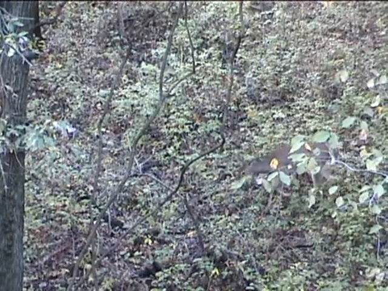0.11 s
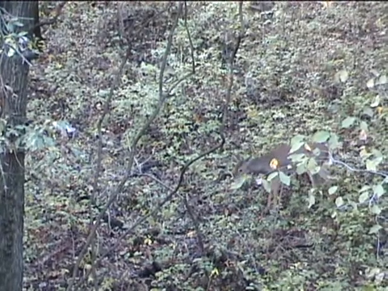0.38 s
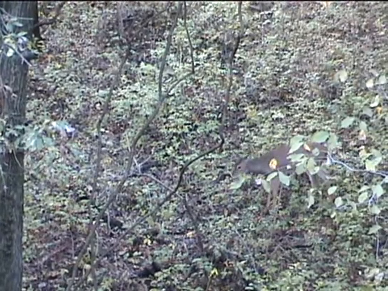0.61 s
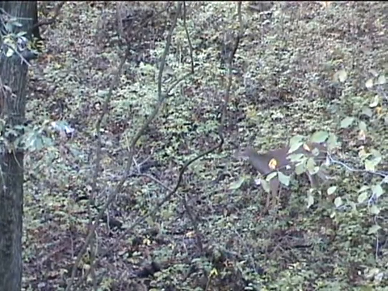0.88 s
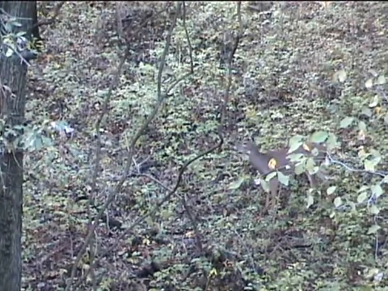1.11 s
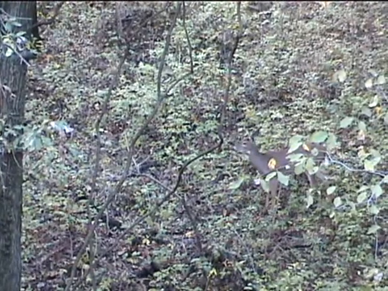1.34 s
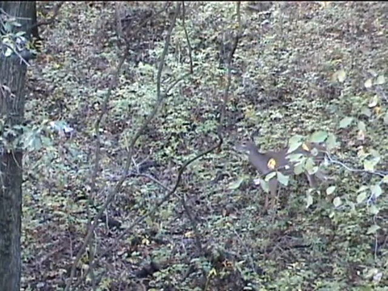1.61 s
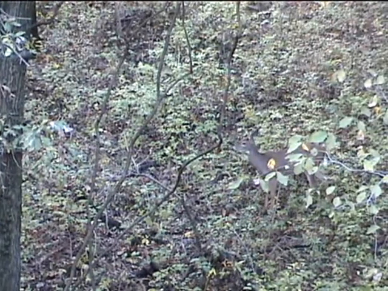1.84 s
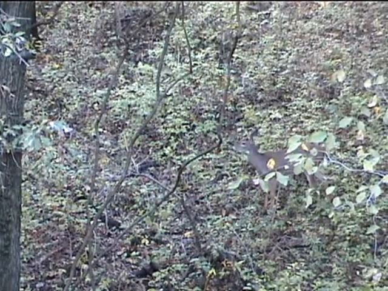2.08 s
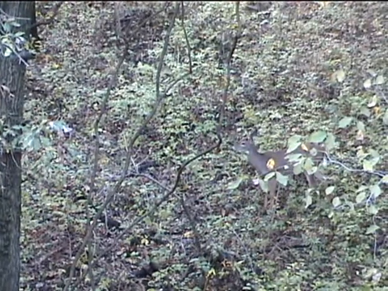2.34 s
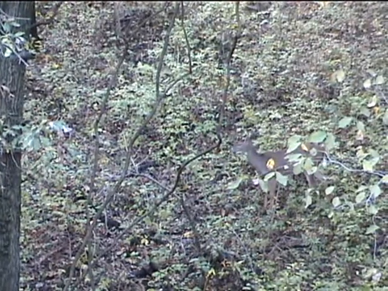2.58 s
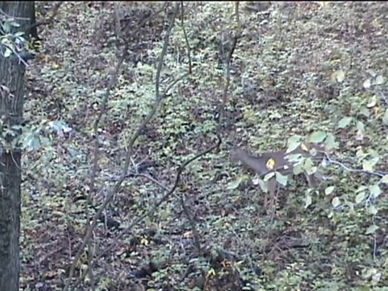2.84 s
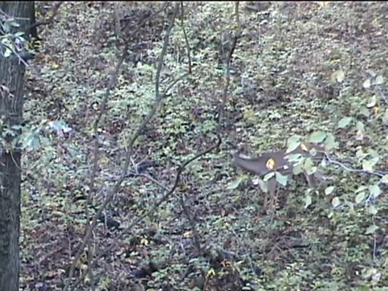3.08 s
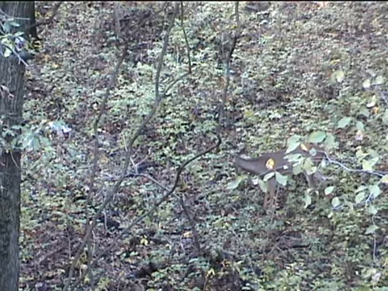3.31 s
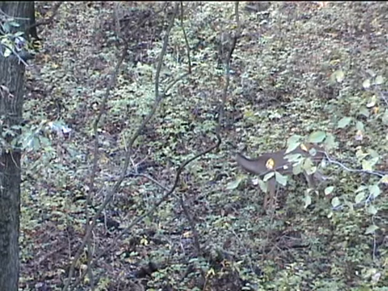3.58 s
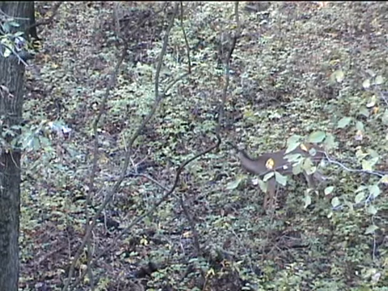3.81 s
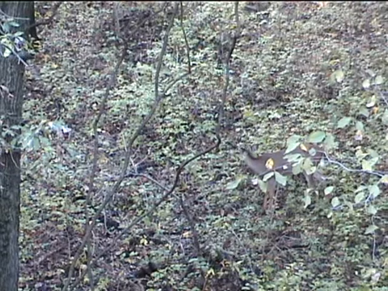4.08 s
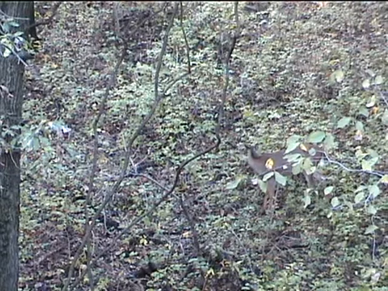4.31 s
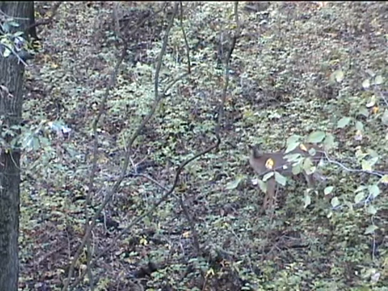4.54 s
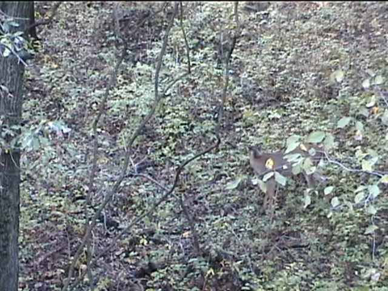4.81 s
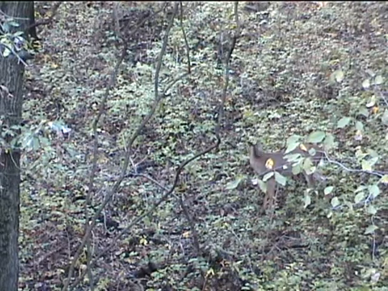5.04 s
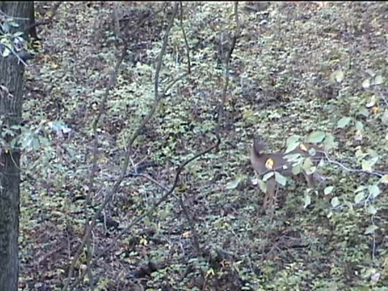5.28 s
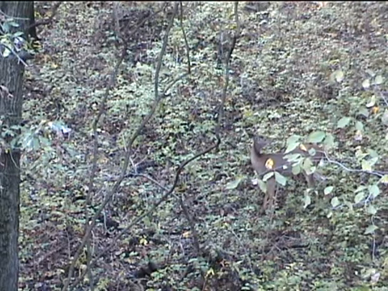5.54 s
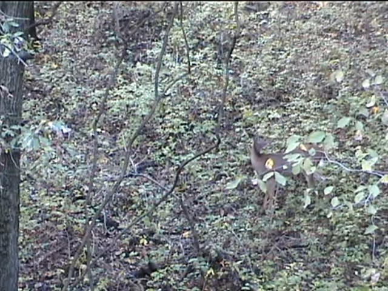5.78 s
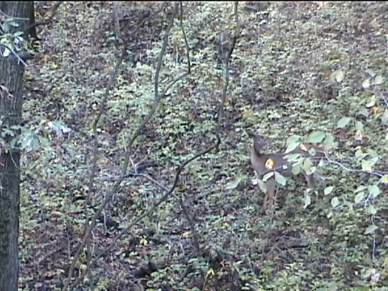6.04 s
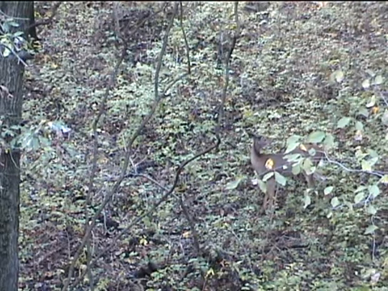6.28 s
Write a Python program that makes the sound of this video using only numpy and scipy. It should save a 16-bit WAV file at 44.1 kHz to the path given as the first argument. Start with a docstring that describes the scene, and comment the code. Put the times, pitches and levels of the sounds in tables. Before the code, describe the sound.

Woodland insects drone and sizzle steadily while one bird repeats a short rising whistle, over thin motor whine and hiss; late, a twig ticks and knocks.

```python
"""Woodland, up in a tree: a far chorus of crickets drones near 4.6 kHz, made of noise strokes ringing wings.
Higher insects sizzle above 9 kHz in the same way, and a nearer one saws a short run of rasps.
A bird repeats one rising whistle, a gliding near sine that echoes among the trunks; a second bird is fainter.
A twig ticks, then knocks dully: a few fading tones. The camera's tape mechanism whines into its own stereo
microphone as a comb of thin tones over filtered hiss; at moments the treble gathers in the centre."""
import sys
import numpy as np
from scipy import signal
from scipy.fft import rfft, irfft
from scipy.io import wavfile
from scipy.ndimage import map_coordinates

SR = 44100
rng = np.random.default_rng(int(sys.argv[2]) if len(sys.argv) > 2 else 0)


def amplitude_ratio(level_db):
    """Convert a level in decibels to the matching linear amplitude (field) ratio."""
    exponent = np.asarray(level_db, float) / 20
    return 10 ** exponent


def store_wav(level_fs):
    """Save 16-bit WAV to argv[1]."""
    pcm = np.round(np.clip(np.atleast_2d(level_fs), -1, 1) * 32767)
    wavfile.write(sys.argv[1], SR, pcm.T.astype(np.int16))


N = 282240
T = np.arange(N) / SR                # time of every sample, in seconds
HZ = np.arange(N // 2 + 1) * SR / N  # pitch of every FFT bin


def level_over_time(rows):
    """Joins (start_s, level_db) points by straight lines, at every sample."""
    start_s, level_db = np.transpose(rows)
    return np.interp(T, start_s, level_db)


def at_hz(points):
    """Joins the columns of a spectrum at every FFT bin, along a logarithmic pitch axis."""
    hz, *columns = np.transpose(points)
    return np.array([np.interp(np.log(HZ + 1), np.log(hz), column) for column in columns])


def bell(hz, width_hz):
    """Gain of a resonance applied twice: 1 on top, 6 dB down half a width to either side."""
    return 1 / (1 + ((HZ - hz) / (width_hz / 2)) ** 2)


def drift(points_per_s):
    """Slow random wandering: a smooth curve through random points of spread 1."""
    points = rng.standard_normal(int(N / SR * points_per_s) + 2)
    return map_coordinates(points, [T * points_per_s], order=3, mode="nearest")


def strokes(per_s):
    """Wing strokes of many animals at random moments, for centre and width; rms 1."""
    share = min(per_s / SR, 1)
    sounding = rng.random((2, N)) < share
    return rng.standard_normal((2, N)) * sounding / np.sqrt(share)


# how the microphone leans, mostly to the right: pitch_hz, left_minus_right_db
MICROPHONE_LEAN = [(60, -2.5), (120, 0), (240, -2), (470, 1), (940, -3.0), (1880, -2), (3750, -1.0),
                   (7470, -3), (14900, 0)]


def coloured(source, gain):
    """Filters a centre and a width signal, then adds and subtracts them into a leaning left and right."""
    mid, side = rfft(source) * gain
    lean_db = at_hz(MICROPHONE_LEAN) * np.array([[.5], [-.5]])
    return irfft(np.array([mid + side, mid - side]) * amplitude_ratio(lean_db), N)


# hiss of microphone, casing and air, before the casing's colour:
# pitch_hz, centre_db (per Hz), width_db (per Hz)
HISS_SPECTRUM = [(25, -102, -99), (100, -99, -88), (203, -95.5, -85), (360, -92, -87.5), (580, -92, -90.5),
                 (1000, -92.5, -92.5), (1220, -92.5, -93), (1680, -91, -94), (2540, -95.5, -93),
                 (3120, -93.5, -87), (3580, -101, -102), (5600, -95, -92), (7800, -99, -98.5),
                 (8850, -96.5, -93), (16000, -100, -100)]
# resonances and notches of the casing in the hiss: pitch_hz, width_hz, level_db
CASING_COLOUR = [(1184, 65, -1.5), (1753, 84, 4), (2140, 46, 4.5), (2075, 50, -7.5), (2460, 32, 4),
                 (2560, 50, -8.5), (2625, 92, 4.5), (2830, 91, -12), (2770, 60, 6.5), (7030, 130, -5)]


def hiss():
    """Steady filtered noise; in the bass the two capsules work against each other."""
    casing_db = sum(db * bell(hz, width_hz) for hz, width_hz, db in CASING_COLOUR)
    gain = amplitude_ratio(at_hz(HISS_SPECTRUM) + casing_db) * np.sqrt(SR / 2)
    return coloured(rng.standard_normal((2, N)), gain)


# tones of the head drum, before flutter: multiple of its turning rate, left_db (rms), right_db (rms)
DRUM_TONES = [(1, -73, -71), (3, -76, -71), (9, -77, -72), (11, -76, -72), (13, -71, -69), (15, -75, -69),
              (17, -77, -67), (19, -76, -67), (21, -78, -76), (23, -74, -65), (25, -71, -66),
              (27, -65, -65), (29, -73, -76), (31, -76, -68), (33, -78, -74), (35, -69, -69),
              (37, -72, -74)]
# high drum tones, mostly in the right capsule, before flutter: multiple, right_db (rms)
HIGH_DRUM_TONES = [(75, -73), (84, -73), (87, -72), (88, -74), (89, -70), (91, -73), (92, -70), (95, -73),
                   (97, -74), (99, -74), (100, -71), (112, -74), (122, -72), (130, -72), (142, -73)]
# other motor and gear tones, before flutter: pitch_hz, left_db (rms), right_db (rms)
GEAR_TONES = [(658.2, -76, -92), (799.8, -79, -68), (949.8, -72, -77), (1087.6, -76, -82),
              (1752.0, -75, -75), (1782.0, -71, -73), (1808.2, -74, -72), (2005.3, -76, -70),
              (2040.9, -64, -59.5), (2232.9, -75, -67), (2332.4, -87, -74), (2424.0, -76, -76),
              (2450.5, -79, -63), (2456.4, -78, -65), (2482.0, -73, -81), (2679.2, -77, -75),
              (2895.8, -76, -72)]
# how far the drum's tones lead in the right capsule: pitch_hz, lead_rad
DRUM_RIGHT_LEAD = [(75, -3.5), (225, -2.7), (675, -1.8), (975, 0), (2020, -.2), (2200, 1.2), (2800, 1.1),
                   (5600, 3.2), (6800, 3.7), (7500, 3.1)]
# how far the gear tones lead in the right capsule; it flips near 2.4 kHz: pitch_hz, lead_rad
GEAR_RIGHT_LEAD = [(950, -1.4), (1750, -1), (2040, -2.1), (2340, -2.3), (2450, 1.9)]


def whine(drum_wobble_rad=.002, gear_wobble_rad=.3, scatter_rad=1.0, flutter_db=.7):
    """Thin tones; each reaches the two capsules through the casing with its own strength and lag."""
    drum_hz = 74.924  # turns per second
    high_left_db, faint_db = -10, -77  # left relative to right in high tones; right level of faint ones
    wobbles = [drift(2.975) for _ in range(6)]  # the shafts never turn quite evenly
    flutters = [amplitude_ratio(flutter_db * wobble) for wobble in wobbles]
    starts = rng.standard_normal(200)

    # The drum sounds at whole multiples of its turning rate.
    orders = [*DRUM_TONES]
    orders += [(k, db + high_left_db, db) for k, db in HIGH_DRUM_TONES]
    faint = [*range(69, 103, 2), *range(96, 144, 2)]  # odd, then even multiples
    orders += [(k, faint_db + high_left_db, faint_db) for k in faint if k not in dict(HIGH_DRUM_TONES)]
    leads = [np.interp(k * drum_hz, *np.transpose(DRUM_RIGHT_LEAD)) for k, *_ in orders]
    leads += [np.interp(hz, *np.transpose(GEAR_RIGHT_LEAD)) for hz, *_ in GEAR_TONES]

    out = np.zeros((2, N))
    drum_phase = 2 * np.pi * drum_hz * T + drum_wobble_rad * wobbles[0]
    for i, (tone, lead) in enumerate(zip([*orders, *GEAR_TONES], leads)):
        multiple_or_hz, left_db, right_db = tone
        if i < len(orders):
            # roughly in step with one another: a faint buzz
            phase = multiple_or_hz * drum_phase + scatter_rad * starts[multiple_or_hz]
        else:
            gear = i - len(orders) + 1
            phase = 2 * np.pi * multiple_or_hz * T + 9 * starts[-gear] + gear_wobble_rad * wobbles[gear % 6]
        size = np.sqrt(2) * flutters[(i + 3) % 6]  # a sine of rms 1, fluttering
        out[0] += amplitude_ratio(left_db) * size * np.cos(phase - lead / 2)
        out[1] += amplitude_ratio(right_db) * size * np.cos(phase + lead / 2)
    return out


# resonances of cricket wings: pitch_hz, width_hz (of one simple resonance), level_db (relative)
CRICKET_WINGS = [(4656, 960, 3), (4268, 775, -4), (3870, 220, -14), (5420, 430, -19.5)]
# loudness of the chorus's centre, before waver and lean: start_s, level_db (rms)
CHORUS_LEVEL = [(0.0, -45.5), (0.46, -47), (2.58, -46), (2.76, -47.5), (3.74, -47), (4.15, -46),
                (4.51, -47), (5.92, -46.5), (6.4, -47)]


def crickets(width_db=-2.0, waver_db=.3):
    """So many strokes ring the wings that they melt into a drone."""
    power = sum((amplitude_ratio(db) * bell(hz, width_hz) ** 2) ** 2 for hz, width_hz, db in CRICKET_WINGS)
    wings = np.sqrt(power / np.mean(power))
    level_db = level_over_time(CHORUS_LEVEL) + waver_db * drift(9.0)
    return amplitude_ratio(level_db) * coloured(strokes(30000), wings * amplitude_ratio(np.array([[0], [width_db]])))


# colour of the high insects: pitch_hz, centre_db (relative, per Hz), width_db (relative, per Hz)
SIZZLE_SPECTRUM = [(5960, -24, -20), (8070, -18, -24), (10200, -11.5, -5), (11580, -4.5, -4.5),
                   (12400, -1.5, 2), (13760, -4.5, -9), (15700, -12.5, -3), (16500, -14, -16)]
# loudness of the sizzle's centre, before waver and lean: start_s, level_db (rms)
SIZZLE_LEVEL = [(0.0, -49), (0.1, -48), (0.43, -48.5), (0.64, -51), (1.8, -54), (2.05, -52), (2.69, -54),
                (3.69, -50), (4.24, -49.5), (4.39, -52.5), (4.79, -51.5), (5.11, -51.5), (5.45, -51.5),
                (5.6, -52.5), (6.4, -54)]


def high_insects(waver_db=.5):
    """Dense wing strokes filtered into a broad dry sizzle that swells and flickers."""
    gain = amplitude_ratio(at_hz(SIZZLE_SPECTRUM))
    gain = gain / np.sqrt(np.mean(gain[0] ** 2))
    level_db = level_over_time(SIZZLE_LEVEL) + waver_db * drift(13.0)
    return amplitude_ratio(level_db) * coloured(strokes(36000), gain)


# whistles: start_s, length_s, top_hz, level_db (rms, before swell, fade and placing)
BIRD_WHISTLES = [(0.449, 0.056, 3140, -46), (1.423, 0.065, 3210, -44.5), (2.354, 0.074, 3330, -41),
                 (3.139, 0.073, 3310, -43), (4.077, 0.07, 3310, -41), (4.848, 0.077, 3283, -41),
                 (5.569, 0.069, 3326, -39.5)]
# one note of a second, fainter bird: the same columns, then from_hz
FAINT_BIRD_NOTE = (3.985, .065, 3660, -57, 3600)


def bird(overtone_db=-43.0, edge_s=0.0015):
    """A near sine whose pitch glides up and levels off while it swells quickly, then weakens."""
    whistle_from_hz, glide_s = 2760, 0.02255  # pitch sets off here and closes in on its top
    swell_db, swell_s = 19, 0.018  # level starts this far down and closes in likewise
    fade_db_per_s = 15
    out = np.zeros(N)
    notes = [[*row, whistle_from_hz] for row in BIRD_WHISTLES] + [FAINT_BIRD_NOTE]
    for start_s, length_s, top_hz, level_db, from_hz in notes:
        t = np.arange(int(length_s * SR)) / SR
        pitch_hz = top_hz - (top_hz - from_hz) * np.exp(-t / glide_s)
        phase = 2 * np.pi * np.cumsum(pitch_hz) / SR
        edges = np.clip(np.minimum(t, length_s - t) / edge_s, 0, 1)
        loudness = amplitude_ratio(level_db - swell_db * np.exp(-t / swell_s) - fade_db_per_s * t)
        tone = np.sin(phase) + amplitude_ratio(overtone_db) * np.sin(2 * phase)
        at = round(start_s * SR)
        out[at:at + len(t)] += edges * loudness * np.sqrt(2) * tone
    return out


def trunks(x, early_t60=.17, late_t60=1.5, late_db=-16, gap_s=.02, width_db=-4):
    """Scattered echoes from near trees, then a long faint haze, partly alike on both sides."""
    t = np.arange(SR) / SR
    # t60: seconds to fade by 60 dB
    fade = amplitude_ratio(-60 * t / early_t60) + amplitude_ratio(late_db - 60 * t / late_t60)
    fade = fade * (t > gap_s)
    echoes = rng.standard_normal((2, SR)) * fade / np.sqrt(np.sum(fade ** 2))
    echoed = signal.fftconvolve(x[None], echoes, axes=1)[:, :N]
    mid, side = echoed * amplitude_ratio(np.array([[0], [width_db]]))
    return np.array([mid + side, mid - side])


# successive rasps: level_db (before their rise and fall and the stereo placing)
RASP_LEVELS = [-57, -56, -54, -54, -51, -50]


def katydid(low_hz=11700, high_hz=13200, width_hz=1200, rise_s=.008, fall_s=.03):
    """A nearer insect saws a short run of rasps, wing strokes through two resonances, heard wide."""
    first_s, every_s = 1.6, 0.113
    swing = np.zeros(N)
    for i, level_db in enumerate(RASP_LEVELS):
        since = T - (first_s + every_s * i)
        rise = 1 - np.exp(-np.maximum(since, 0) / rise_s)
        swing += amplitude_ratio(level_db) * rise * np.exp(-np.abs(since) / fall_s)
    wing = bell(low_hz, width_hz) + bell(high_hz, width_hz)
    wing = wing / np.sqrt(np.mean(wing ** 2))
    centre_and_width = amplitude_ratio(np.array([[-3.0], [0]]))
    return swing * coloured(strokes(20000), wing * centre_and_width)


# small hits: start_s, peak_db (midway between the sides), left_minus_right_db, softness (0 to 1)
WOOD_HITS = [(5.354, -40, 7, 0), (5.637, -37, 6, 0.9)]
# ringing tones of the wood: pitch_hz, level_db (before the tilt by softness), t60_s (time to fade 60 dB)
WOOD_TONES = [(3050, 0, .007), (1900, -7, .03), (1270, -5, .04), (640, -2, .04)]


def hits():
    """One piece of wood, struck; a soft contact dulls the high mode and lets the low ones ring."""
    out = np.zeros((2, N))
    t = np.arange(SR // 10) / SR
    for start_s, peak_db, pan_db, softness in WOOD_HITS:
        ring = np.zeros(len(t))
        for hz, db, t60_s in WOOD_TONES:
            tilt_db = -13 * (softness - 1.5) * np.log2(hz / 1800)
            ring += amplitude_ratio(db + tilt_db) * np.sin(2 * np.pi * hz * t) * amplitude_ratio(-60 * t / t60_s)
        ring = ring * (1 - np.exp(-t / (0.00025 + 0.0013 * softness)))  # softer contact, slower start
        sides = amplitude_ratio(peak_db + pan_db * np.array([[.5], [-.5]]))
        at = round(start_s * SR)
        out[:, at:at + len(t)] += sides * ring / np.abs(ring).max()
    return out


def scene():
    """All sources together, with the bird to the left: louder there, and two samples earlier."""
    song = bird()
    placed_song = np.array([song, np.roll(song, 2)]) * amplitude_ratio(np.array([[2.0], [-1.2]]))
    knocks = hits()
    echoes = amplitude_ratio(-3.5) * trunks(song) + amplitude_ratio(-8) * trunks(knocks.mean(axis=0))
    insects = crickets() + high_insects() + katydid()
    return placed_song + knocks + echoes + insects + hiss() + whine()


# moments when the treble narrows to the centre: start_s, end_s
NARROW_MOMENTS = [(3.985, 4.285), (4.445, 4.475), (4.875, 4.975)]


def narrowed(x, from_hz=4800, spared_hz=(6650, 7600), lift_db=3.0, edge_s=0.021):
    """For moments most of the treble loses its width: both sides are swapped for their lifted average."""
    on = np.zeros(N)
    for start_s, end_s in NARROW_MOMENTS:
        on += np.clip(np.minimum(T - start_s, end_s - T) / edge_s + .5, 0, 1)
    affected = (HZ > from_hz) * ((HZ < spared_hz[0]) | (HZ > spared_hz[1]))
    treble = irfft(rfft(x) * affected, N)
    return x + on * (amplitude_ratio(lift_db) * treble.mean(axis=0) - treble)


def band_limit(x):
    """A steep low-pass at the top of the band."""
    return signal.sosfilt(signal.butter(12, 15470, fs=SR, output="sos"), x)


def record(dry, shelf_hz=15180, shelf_db=-34.0):
    """The topmost treble steps down, and at moments the treble narrows."""
    shelf = amplitude_ratio(shelf_db * (HZ > shelf_hz))
    mix = narrowed(irfft(rfft(dry) * shelf, N))
    return band_limit(mix)


dry = scene()
out = record(dry)
store_wav(out)
```